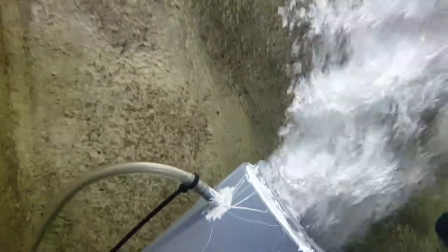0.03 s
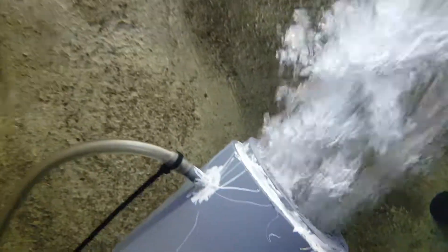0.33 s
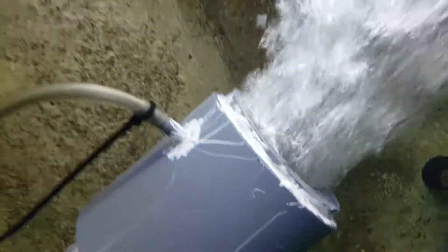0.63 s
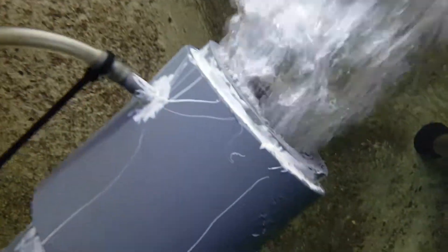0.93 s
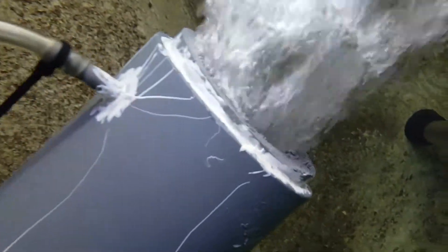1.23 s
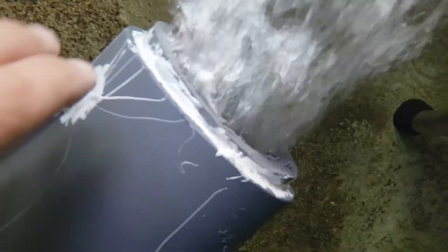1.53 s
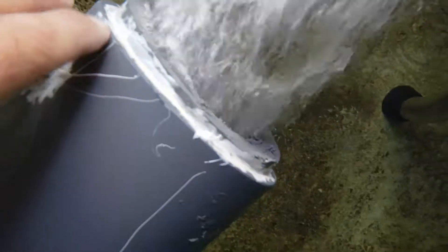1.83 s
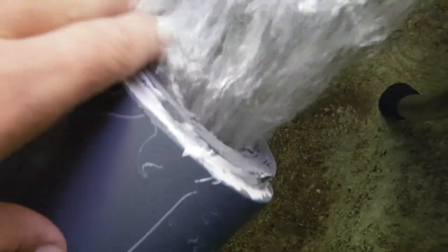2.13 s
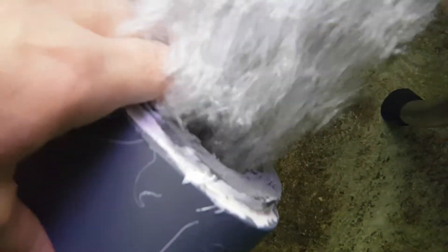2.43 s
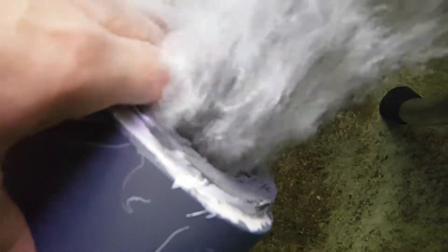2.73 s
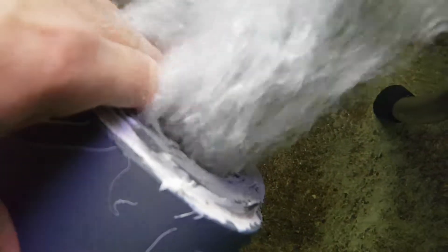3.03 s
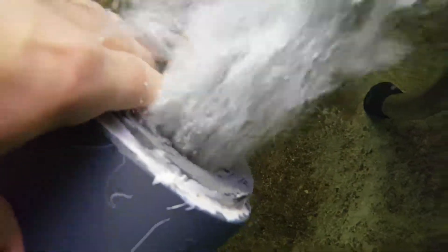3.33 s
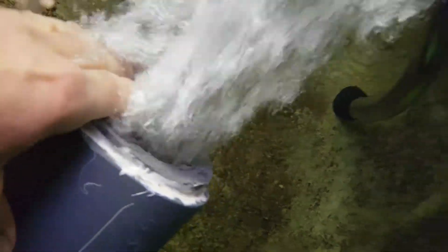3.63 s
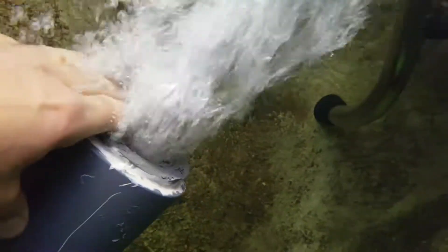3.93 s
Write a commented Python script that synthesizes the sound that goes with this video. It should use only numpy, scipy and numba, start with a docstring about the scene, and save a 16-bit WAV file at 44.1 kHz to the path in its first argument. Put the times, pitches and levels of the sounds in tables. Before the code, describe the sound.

A strong stream of bubbles rumbles and throbs throughout, close and muffled, underwater in a tank. A low pump hum lies beneath it and small bubbles fizz on top. One sharp click comes at about 1.4 seconds. From about 2.3 seconds the fizz fades, a hollow gurgle sinks in pitch, and faint, dull overload crackles ride the loudest peaks, mostly on the left, until 4 seconds.

```python
"""Underwater in a tank, near a pipe that gushes air and water; the microphones are in a camera housing.
The pulsating plume booms and sheds large bubbles over a pump's hum; small bubbles fizz, eddies rumble.
Each side of the housing rings at its own pitch. One sharp click sounds. As the camera closes in,
the ring and a hollow gurgle sink, the fizz fades, and the left microphone crackles with overload
on loud peaks of the plume's rumble."""
import sys
import numpy as np
from scipy import signal
from scipy.fft import rfft, irfft
from scipy.io import wavfile
from scipy.ndimage import uniform_filter1d, minimum_filter1d
from numba import njit

SR = 44100
rng = np.random.default_rng(int(sys.argv[2]) if len(sys.argv) > 2 else 0)


def generate_wav(signal):
    """Clip the signal to [-1, 1] and save it as 16-bit WAV at the path in sys.argv[1]."""
    frames = np.transpose(np.atleast_2d(signal))
    scaled = np.clip(frames, -1, 1) * 32767
    pcm = np.round(scaled).astype(np.int16)
    wavfile.write(sys.argv[1], SR, pcm)


N = 4 * SR


def from_db(db):
    """Decibels to gain."""
    return 10 ** (np.asarray(db) / 20)


def rms_one(x):
    """Scale to rms 1."""
    return x / np.sqrt(np.mean(x ** 2) + 1e-20)


def in_time(rows):
    """Each column of a table after t/s, sample by sample."""
    times, *columns = np.transpose(rows)
    return np.array([np.interp(np.arange(N) / SR, times, column) for column in columns])


def colour(x, spectrum):
    """Shape a sound by points of f/Hz, gain/dB."""
    hz, db = np.transpose(spectrum)
    bins = np.maximum(np.fft.rfftfreq(N, 1 / SR), 1)
    return irfft(rfft(x) * from_db(np.interp(np.log(bins), np.log(hz), db)), N)


def smooth(x, seconds):
    """Round the corners of a level curve."""
    span = int(seconds * SR) | 1
    return np.maximum(uniform_filter1d(uniform_filter1d(x, span), span), 0)


def drift(rate_hz):
    """A smooth random wander; rms 1."""
    rolloff = 1 + (np.fft.rfftfreq(N, 1 / SR) / rate_hz) ** 4
    return rms_one(irfft(rfft(rng.standard_normal(N)) / rolloff, N))


def pops(per_s, spread_db=2.5):
    """Random clicks of uneven size and sign."""
    sizes = from_db(spread_db * np.minimum(rng.exponential(1, N), 4))
    return sizes * rng.choice([-1, 1], N) * (rng.random(N) < per_s / SR)


def bubble_cloud(per_s, cycles, low_hz, high_hz, sizes):
    """Bubbles ring at a pitch set by their size, dying by 60 dB over `cycles`; even power per Hz."""
    kicks = pops(per_s)
    size_of_kick = rng.integers(0, sizes, N)
    pitches = np.geomspace(low_hz, high_hz, sizes)
    cloud = np.zeros(N)
    for size, (hz, band_hz) in enumerate(zip(pitches, np.gradient(pitches))):
        decay = np.exp(-np.log(1000) * hz / (cycles * SR))
        poles = [1, -2 * decay * np.cos(2 * np.pi * hz / SR), decay ** 2]
        drive = kicks * (size_of_kick == size) + 1e-12 * kicks
        cloud += np.sqrt(band_hz) * rms_one(signal.lfilter([1, -1], poles, drive))
    return cloud


def throb(hz, width_hz):
    """A randomly driven resonance about a steady or moving pitch; rms 1."""
    phase = 2 * np.pi * np.cumsum(hz * np.ones(N)) / SR
    detuning = 2 * np.abs(np.fft.fftfreq(N, 1 / SR)) / width_hz
    drive = rng.standard_normal(N) + 1j * rng.standard_normal(N)
    sway = np.fft.ifft(drive / (1 + detuning ** 2))
    return rms_one(np.real(sway * np.exp(1j * phase)))


def plume():
    """The air column pulsates with a boom and sheds large bubbles."""
    # course of the plume: t/s, boom f/Hz, boom level/dB, bubbling level/dB
    course = [(0, 97.04, -16.5, 0.5), (.5, 97.07, -12, -1.5), (.75, 92.2, -17, -0.5),
              (1.5, 98.2, -15.5, -1), (2.05, 97.1, -20.5, 0), (2.21, 100.1, -15, 0), (2.6, 104.4, -17.5, 0),
              (3.05, 106.1, -13, 0), (3.3, 104, -21.5, 1), (4, 100.4, -15, 1)]
    # spectrum of the large bubbles: f/Hz, level/dB
    spectrum = [(25, -58), (45, -58), (70, -45.5), (130, -42.5), (190, -47), (260, -43.5), (350, -43),
                (450, -44), (570, -46), (720, -54), (900, -58.5), (1300, -76)]
    hz, boom_db, bubbling_db = in_time(course)
    boom = throb(hz, width_hz=26.8)
    overtone = from_db(-10) * throb(hz=147.9, width_hz=16)
    bubbles = bubble_cloud(per_s=2500, cycles=12.7, low_hz=41.7, high_hz=1111, sizes=30)
    return from_db(boom_db) * (boom + overtone) + from_db(bubbling_db) * colour(bubbles, spectrum)


def pump(waver_db=2.5):
    """The pump hums on two low tones that waver in level."""
    # tones of the hum: f/Hz, level/dB
    tones = [(49.8, -38), (99.6, -19.5)]
    t = np.arange(N) / SR
    hum = np.zeros(N)
    for hz, db in tones:
        amplitude = np.sqrt(2) * from_db(db + waver_db * drift(rate_hz=11))
        hum += amplitude * np.sin(2 * np.pi * (hz * t + rng.random()))
    return hum


@njit
def resonant_wall(pressure, hz, q):
    """A mass on a spring with moving pitch: passes the bass, rings, and blocks the treble."""
    step = 2 * np.pi * hz / SR
    motion, position, speed = np.zeros(len(pressure)), 0.0, 0.0
    for i in range(len(pressure)):
        speed += step[i] * (pressure[i] - position - speed / q)
        position += step[i] * speed
        motion[i] = position
    return motion


def housing(water):
    """Each side of the housing passes the water's sound to its microphone through its own resonance."""
    # ring of the walls: t/s, left f/Hz, right f/Hz
    ring = [(0, 585, 330.4), (1.199, 587, 336.6), (2.2, 557.4, 335), (2.7, 527, 305), (3.05, 487, 289.2),
            (3.5, 475, 274), (4, 450, 288)]
    left_hz, right_hz = in_time(ring)
    return np.array([resonant_wall(water, left_hz, q=4.0), resonant_wall(water, right_hz, q=1.84)])


def fizz(echo_gain=0.2, scatter_hz=2620, treble_hz=1500, flutter_db=0.79):
    """Small bubbles, with short echoes from the tank walls; the treble scatters into a diffuse hiss."""
    # spectrum of the small bubbles: f/Hz, level/dB
    spectrum = [(500, -63.5), (850, -60.5), (1040, -52.5), (1200, -57.5), (1400, -56), (1560, -60),
                (1800, -63), (2200, -69), (2700, -82), (3600, -90.5), (5000, -105), (6000, -114),
                (7500, -131), (15000, -135)]
    # fizz at the microphones: t/s, left level/dB, right level/dB, diffuse share (0-1)
    course = [(0, 0.5, -3, 0.2), (.7, 0.5, -2.5, .05), (1.4, 1, -3.5, 0.3), (2, 1.5, -3, 0.2),
              (2.5, -6.5, -12, 0.5), (3.1, -9, -13, 0.4), (3.5, -8, -14.5, 0.99), (4, -10.5, -15.5, 0.3)]
    # the fizz dulls, then brightens: t/s, treble gain/dB
    brightness = [(0, 4.5), (1.2, -3), (2.2, -3), (4, 1)]
    left_db, right_db, share = in_time(course)
    direct = bubble_cloud(per_s=4000, cycles=32, low_hz=604, high_hz=7000, sizes=56)
    lags = (rng.uniform(0.002, 0.016, (2, 5)) * SR).astype(int)  # five echoes a side, 2-16 ms late
    echoes = np.array([sum(np.roll(direct, lag) for lag in side) for side in lags])
    diffuse, hiss = np.sqrt(SR / 2) * rng.standard_normal((2, 2, N))
    scattered = signal.sosfilt(signal.butter(2, scatter_hz, "high", fs=SR, output="sos"), hiss)
    mix = np.sqrt(1 - share) * (direct + echo_gain * echoes) + np.sqrt(share) * diffuse + scattered
    treble = signal.sosfiltfilt(signal.butter(2, treble_hz, "high", fs=SR, output="sos"), mix)
    mix += treble * (from_db(in_time(brightness)) - 1)
    level_db = np.array([left_db, right_db]) + flutter_db * drift(rate_hz=33)
    return colour(mix, spectrum) * from_db(level_db)


def eddies():
    """Turbulence buffets each side of the housing separately and rumbles."""
    # spectrum of the rumble: f/Hz, level/dB
    spectrum = [(15, -57), (30, -60.5), (50, -48), (80, -50.5), (200, -46), (500, -66.5), (900, -78.5),
                (2500, -120)]
    # strength of the buffeting: t/s, level/dB
    buffeting = [(0, 6), (.4, 0), (1.5, 3), (2.4, -6), (4, -6)]
    turbulence = np.sqrt(SR / 2) * rng.standard_normal((2, N))  # unit power per Hz
    return colour(turbulence, spectrum) * from_db(in_time(buffeting))


def click(at_s=1.4233, decay_s=0.0015, left_db=3, right_db=-1):
    """One sudden step in pressure that dies at once."""
    age = np.arange(N) / SR - at_s
    return (age >= 0) * np.exp(-np.abs(age) / decay_s) * from_db([[left_db], [right_db]])


def gurgle(right_db=-11):
    """A narrow, unsteady resonance of the jet sinks as a hand reaches into it; mostly on the left."""
    # the hollow resonance: t/s, f/Hz, level/dB
    course = [(0, 560, -60), (2.2, 555, -36), (2.3, 545, -19), (2.45, 538, -29), (2.62, 528, -18),
              (2.9, 495, -22), (3.03, 463, -14), (3.25, 420, -19), (3.57, 420, -18), (3.68, 380, -21),
              (4, 375, -26)]
    hz, db = in_time(course)
    return throb(hz, width_hz=7.3) * from_db(db) * from_db([[0], [right_db]])


def overload_crackles():
    """Strength of brief, timed crackles as the left microphone overloads on loud peaks of the rumble."""
    # bursts of overload: t/s, length/s, relative level/dB
    bursts = [(2.331, .004, -53), (2.459, .01, -48), (2.55, .003, -57), (2.561, 0.019, -52),
              (2.579, 0.0041, -48.5), (2.588, 0.014, -49), (2.611, .005, -47.5), (2.663, .022, -46.5),
              (2.753, 0.0072, -47.5), (2.804, 0.015, -49), (2.826, 0.015, -49), (2.845, .009, -47.5),
              (2.874, 0.015, -54.5), (2.904, 0.0068, -54.5), (2.935, .007, -51), (2.946, .014, -39.5),
              (2.961, .003, -44.5), (2.975, .007, -47), (3.01, 0.0036, -48.5), (3.016, 0.019, -41),
              (3.033, .011, -44.5), (3.045, .017, -44), (3.065, 0.0067, -44.5), (3.071, 0.0053, -44.5),
              (3.077, .005, -43), (3.084, 0.0091, -41.5), (3.094, 0.0073, -43), (3.108, .006, -46.5),
              (3.119, 0.0039, -44), (3.16, .009, -48.5), (3.18, 0.007, -45), (3.188, 0.0039, -48.5),
              (3.249, .015, -51), (3.285, 0.0033, -46.5), (3.3, 0.0079, -49.5), (3.322, .01, -46.5),
              (3.341, 0.018, -47), (3.435, 0.0039, -47), (3.451, 0.0037, -47.5), (3.472, 0.018, -52.5),
              (3.494, 0.0024, -48), (3.507, 0.0078, -54), (3.546, .003, -46.5), (3.574, 0.0051, -48),
              (3.593, 0.0027, -46.5), (3.657, 0.0056, -45.5), (3.697, 0.0028, -47), (3.74, .005, -52.5),
              (3.762, .013, -51), (3.779, 0.0041, -46), (3.817, .003, -47.5), (3.935, 0.005, -52.5),
              (3.954, 0.0026, -45)]
    strength = np.zeros(N)
    for start, length, db in bursts:
        strength[int(start * SR):int((start + length) * SR)] = from_db(db)
    return smooth(strength, seconds=0.0012)


def faint_crackle(uneven_db=6.5):
    """Strength of the faint, uneven overload crackle between the louder bursts."""
    # trend of the faint crackle: t/s, relative level/dB
    trend = [(0, -110), (2.2, -97), (2.6, -71.5), (3.05, -63), (3.5, -71.5), (4, -74)]
    return from_db(in_time(trend)[0] + uneven_db * np.minimum(drift(rate_hz=60), 2))


def crackle(strength, gain_db=11.5, right_db=-15, ragged_db=2.5):
    """The sound of the overload: dull, ragged runs of tiny clicks, mostly on the left."""
    # tone of the crackle: f/Hz, gain/dB
    spectrum = [(400, 0.5), (800, 30.5), (1400, 25.5), (2000, 15.5), (3000, 6.5), (4000, 0), (6000, -11.5),
                (9000, -23), (15000, -24.5)]
    sides = []
    for side_db in (0, right_db):
        clicks = rms_one(pops(per_s=5800))
        flicker_db = ragged_db * np.minimum(drift(rate_hz=300), 2)
        sides.append(clicks * from_db(side_db + flicker_db))
    return from_db(gain_db) * colour(np.array(sides) * strength, spectrum)


def scene(swell_db=7.5):
    """At the microphones: plume and pump through the housing's ring, the other sounds on top."""
    overload = overload_crackles()
    # the plume's rumble peaks at the times of the overload bursts
    swell = from_db(swell_db * smooth(np.sqrt(overload / overload.max()), seconds=0.012))
    crackling = np.maximum(overload, faint_crackle())
    through_walls = housing(plume() * swell + pump())
    return through_walls + gurgle() + fizz() + eddies() + crackle(crackling) + click()


def record(dry, ceiling=0.97, limiter_s=0.004, stopband_hz=17100):
    """The camera's fast, smooth limiter holds the peaks down; a steep filter cuts the top."""
    span = int(limiter_s * SR) | 1
    needed_gain = ceiling / np.maximum(np.abs(dry), ceiling)
    gain = smooth(minimum_filter1d(needed_gain, 2 * span), limiter_s)
    return signal.sosfilt(signal.cheby2(12, 70, stopband_hz, fs=SR, output="sos"), dry * gain)


dry = scene()
out = record(dry)
generate_wav(out)
```